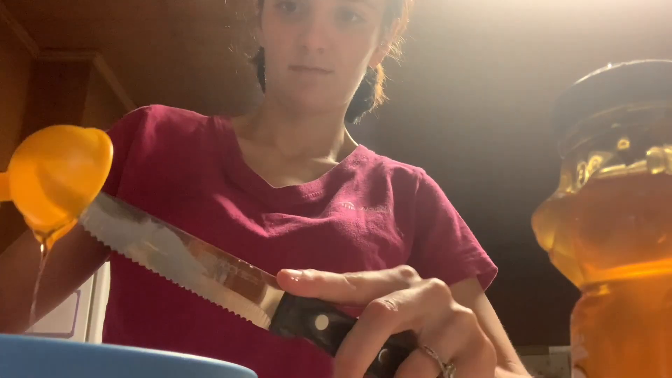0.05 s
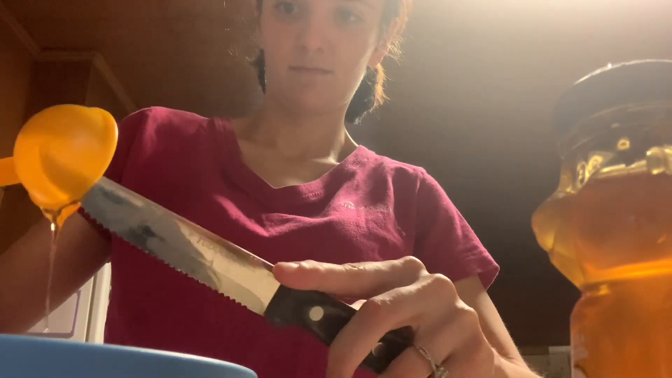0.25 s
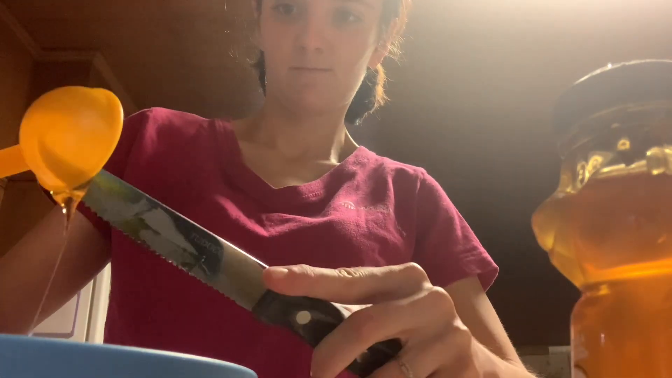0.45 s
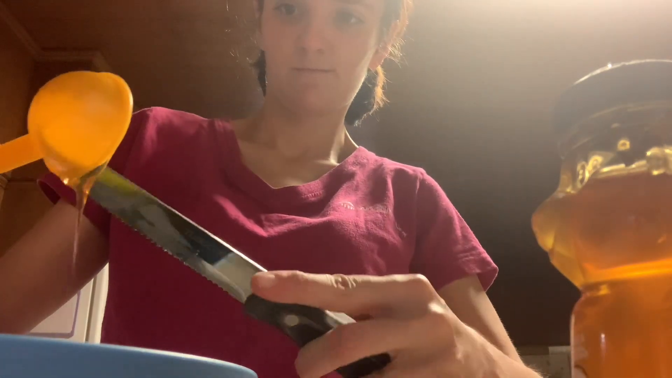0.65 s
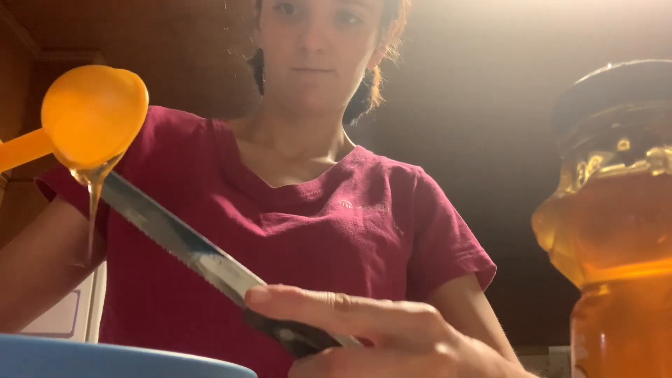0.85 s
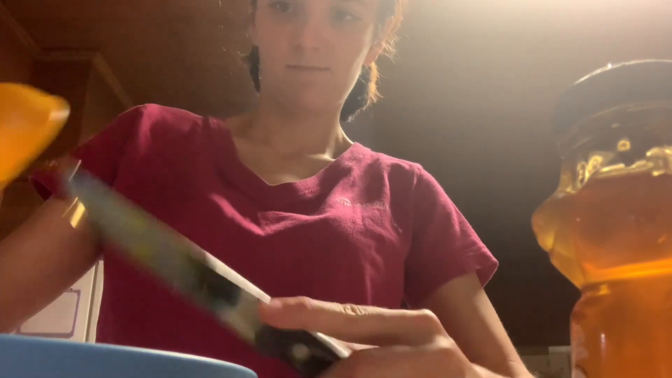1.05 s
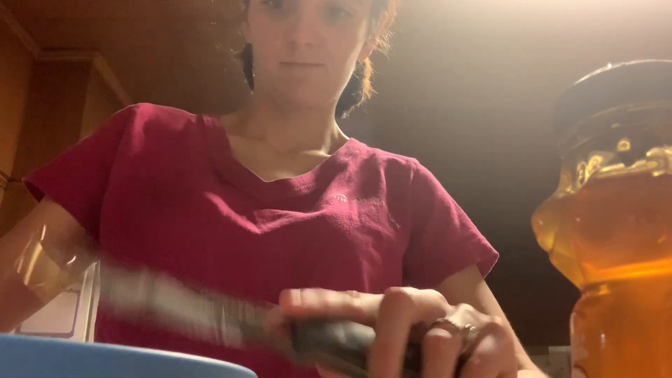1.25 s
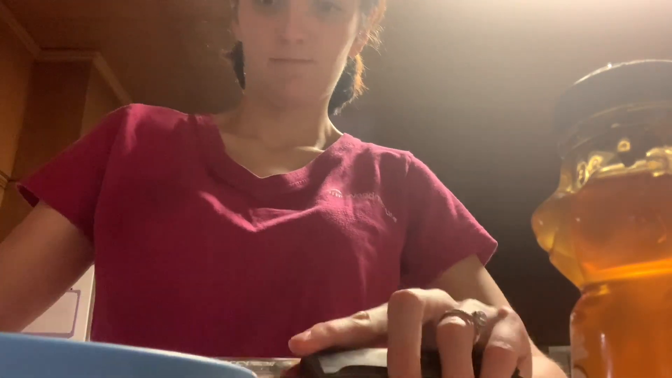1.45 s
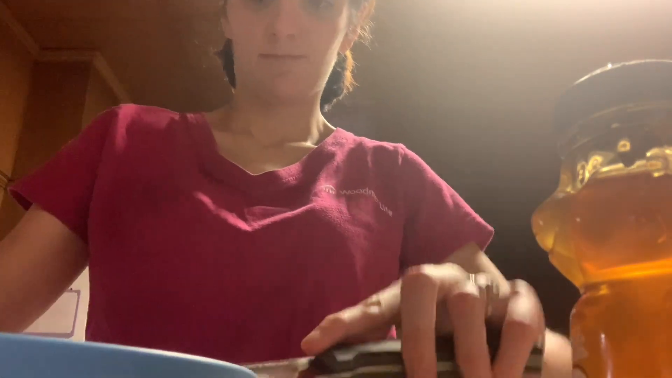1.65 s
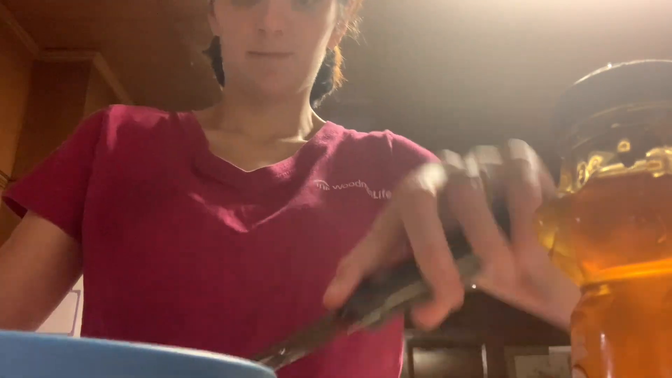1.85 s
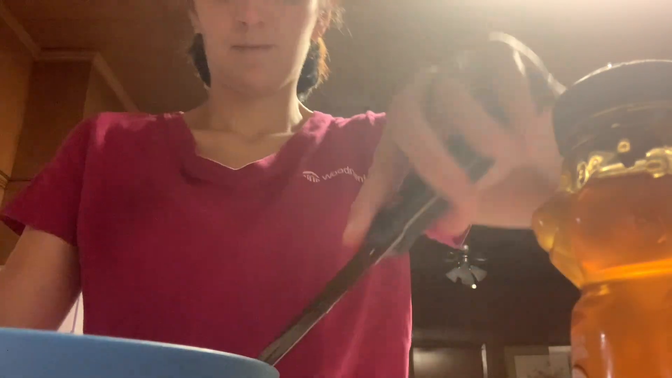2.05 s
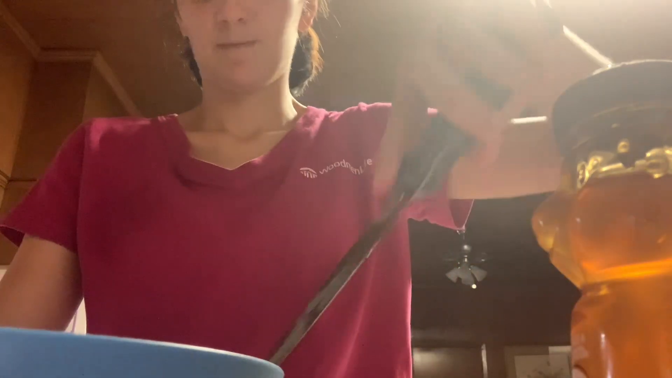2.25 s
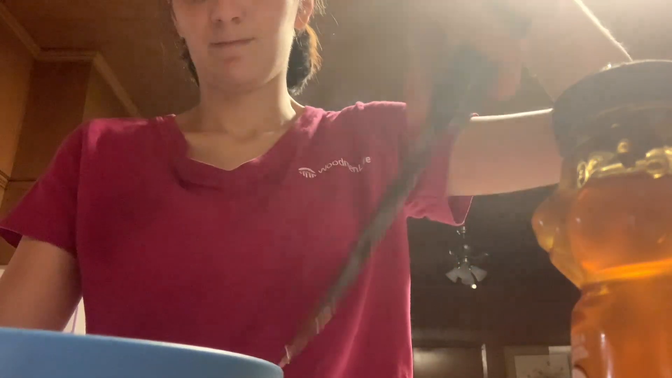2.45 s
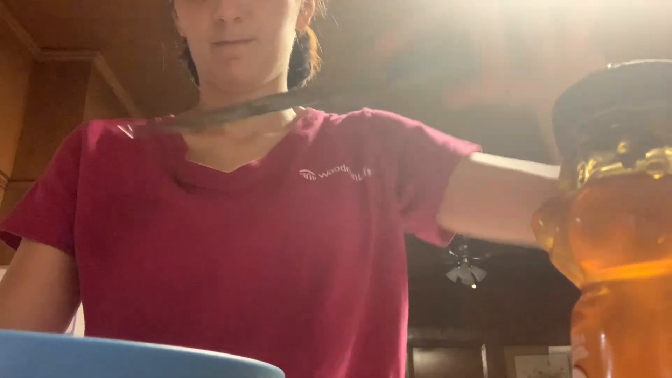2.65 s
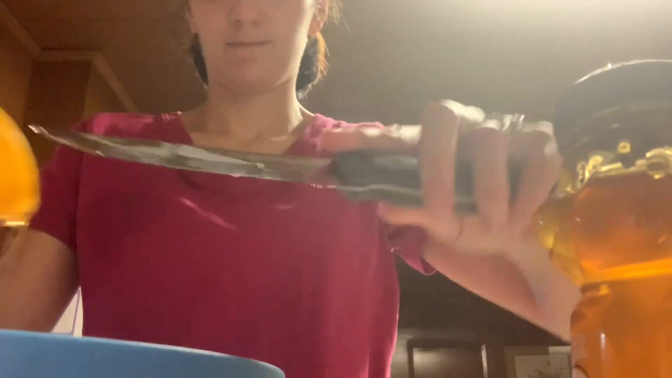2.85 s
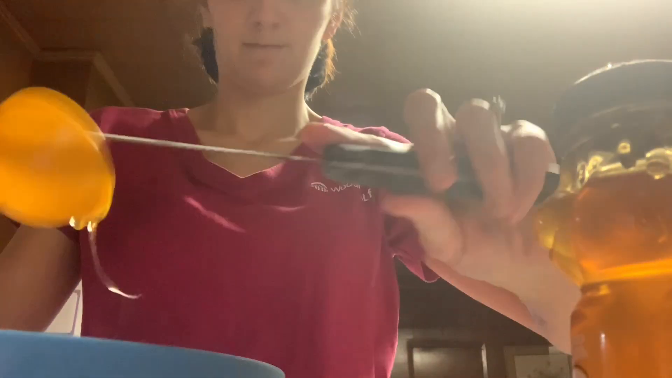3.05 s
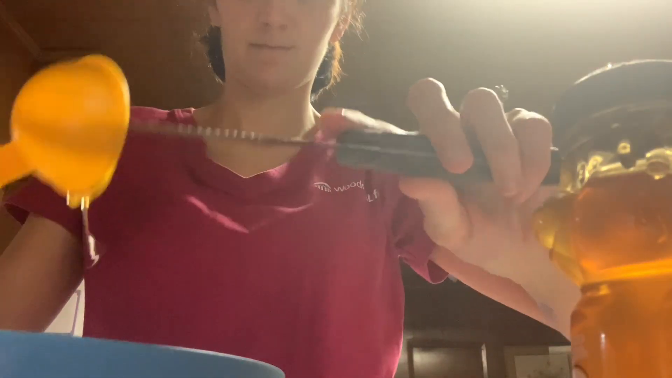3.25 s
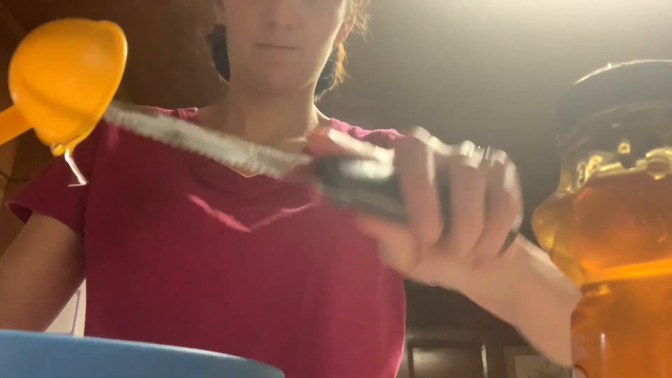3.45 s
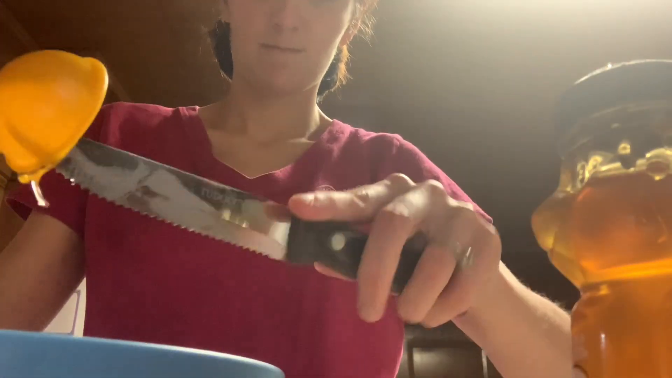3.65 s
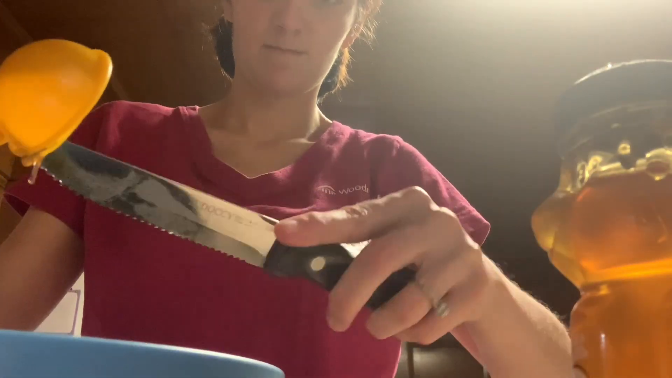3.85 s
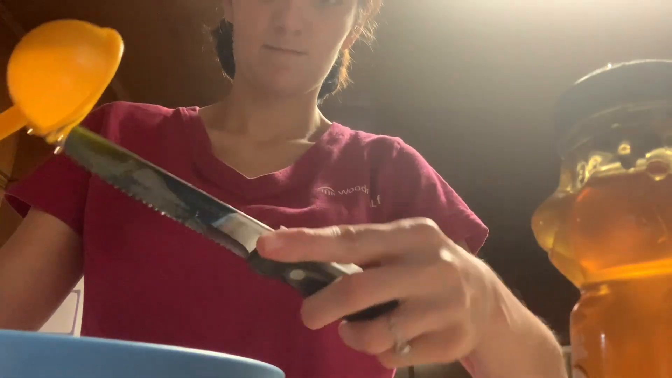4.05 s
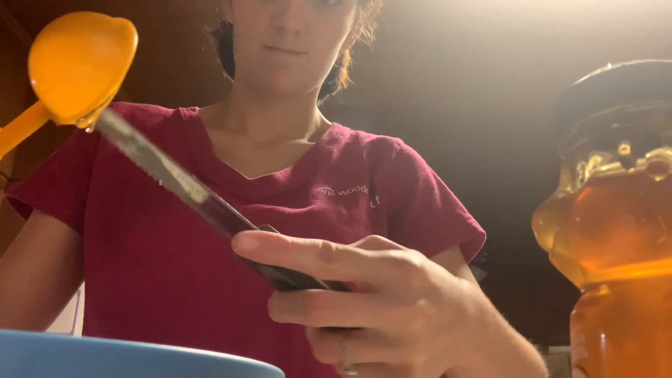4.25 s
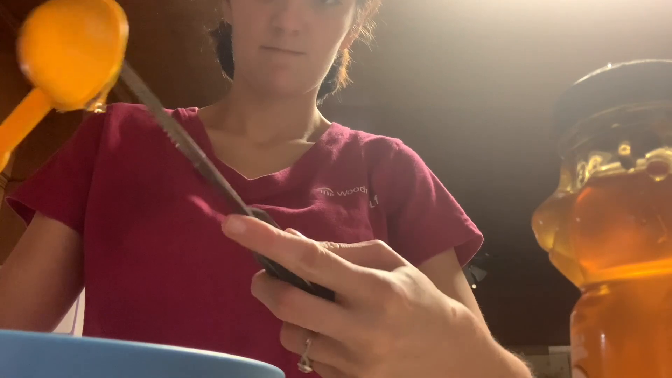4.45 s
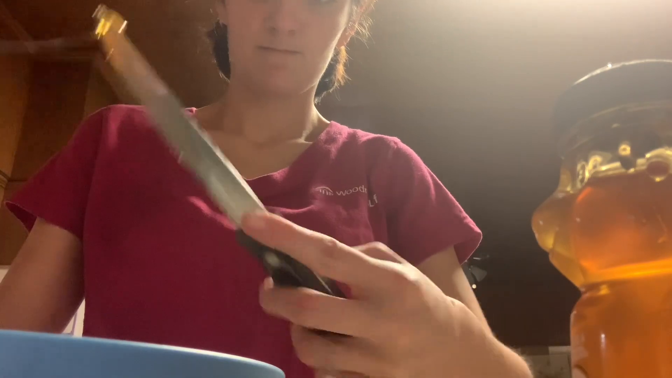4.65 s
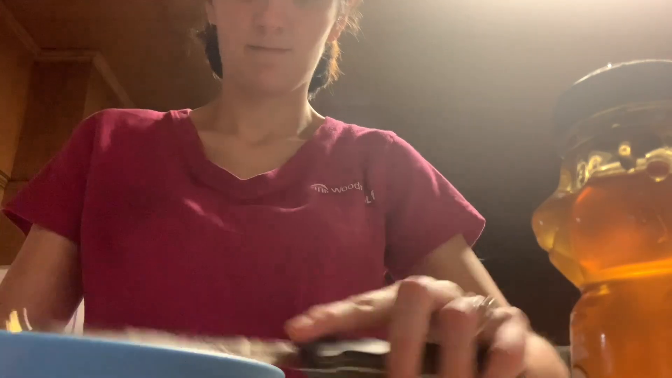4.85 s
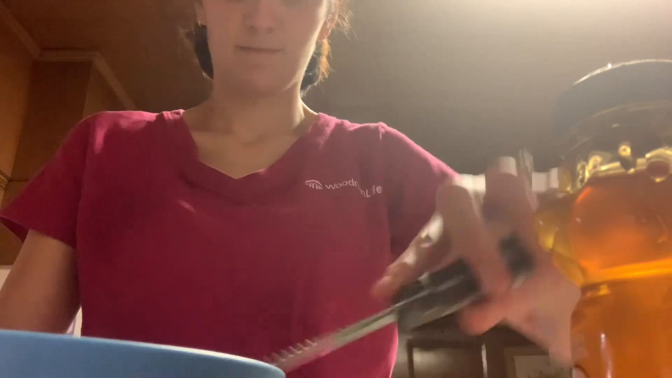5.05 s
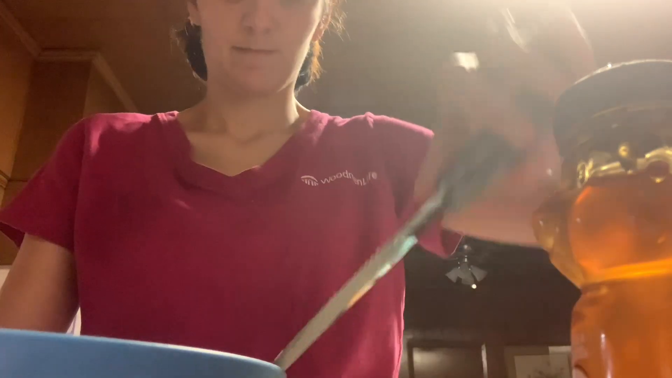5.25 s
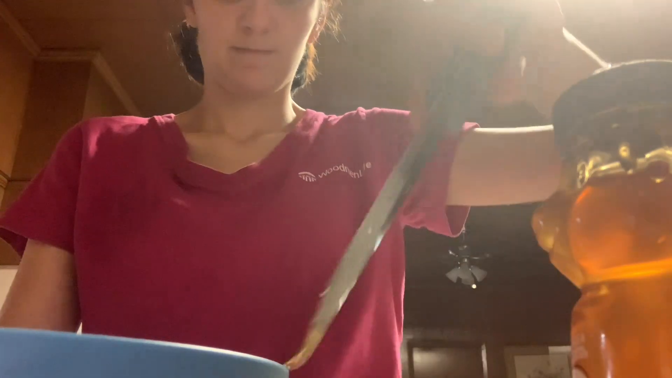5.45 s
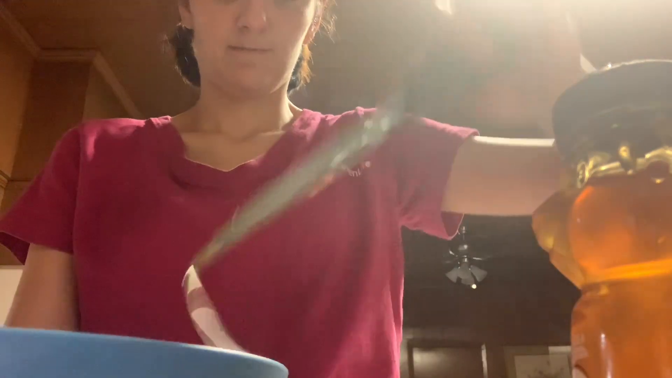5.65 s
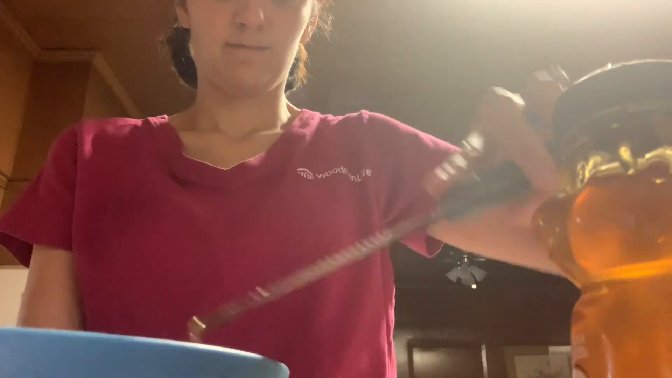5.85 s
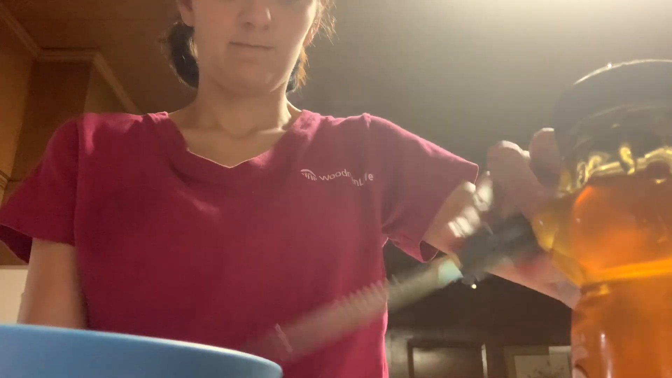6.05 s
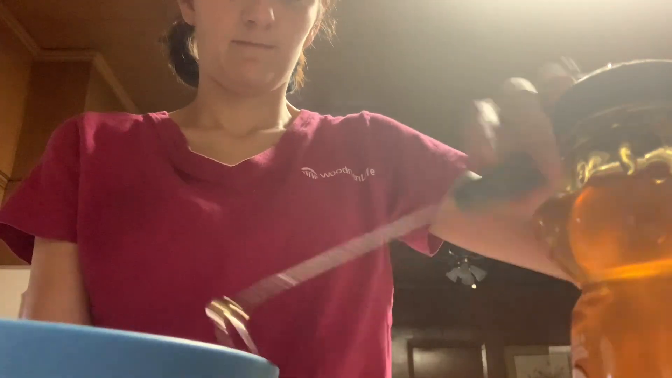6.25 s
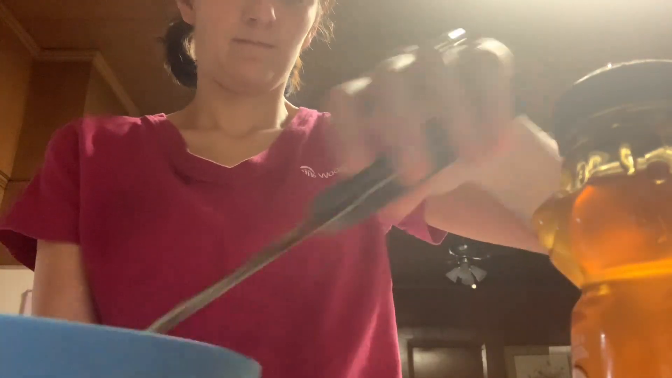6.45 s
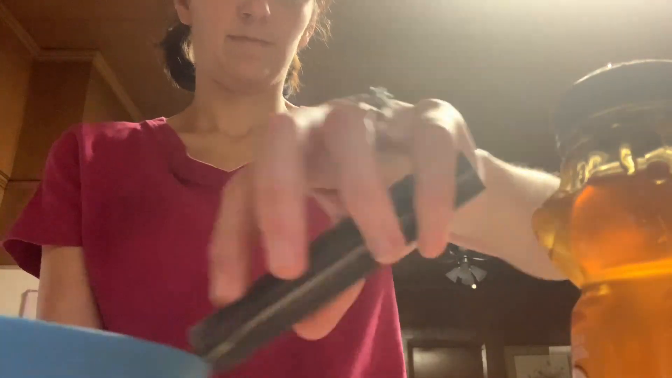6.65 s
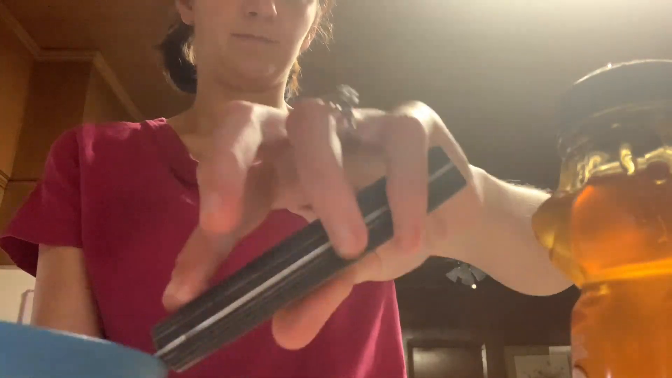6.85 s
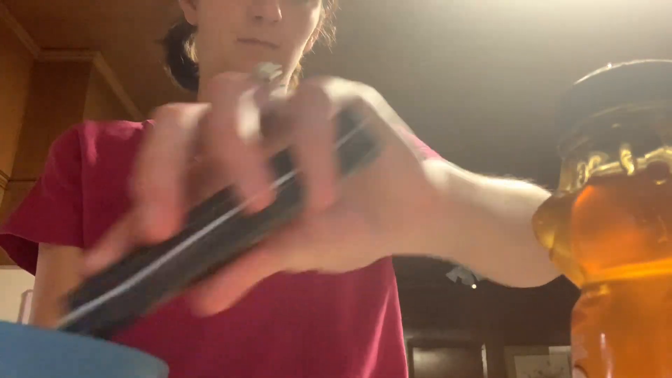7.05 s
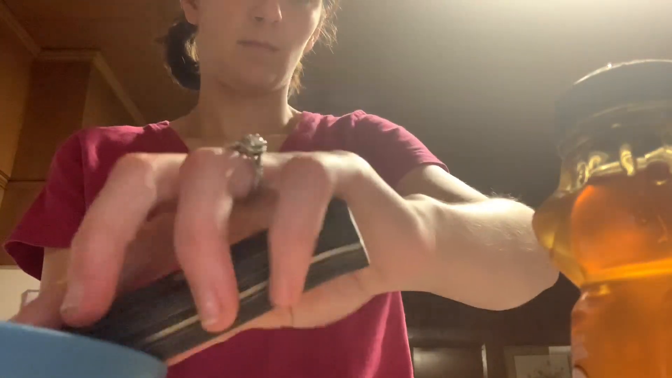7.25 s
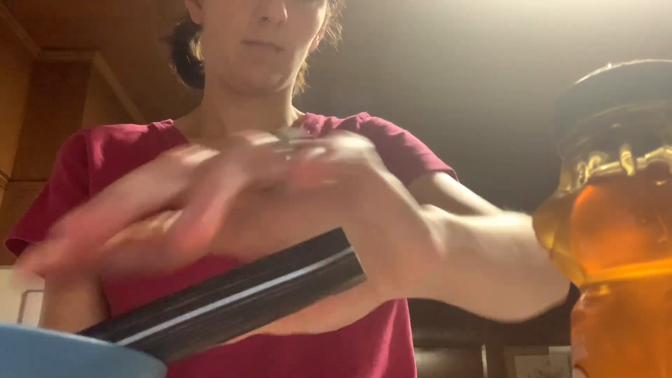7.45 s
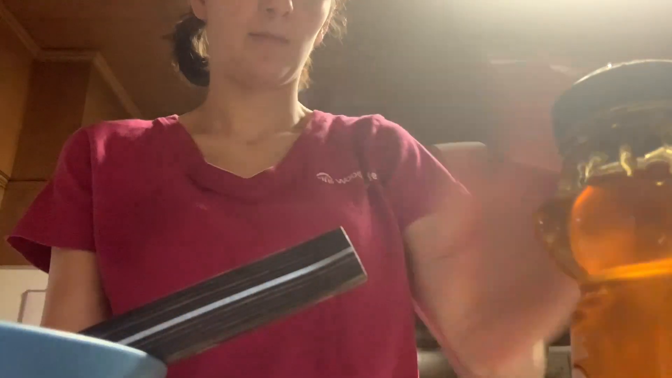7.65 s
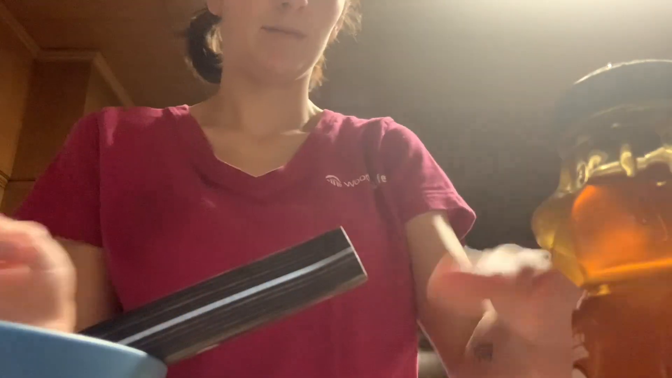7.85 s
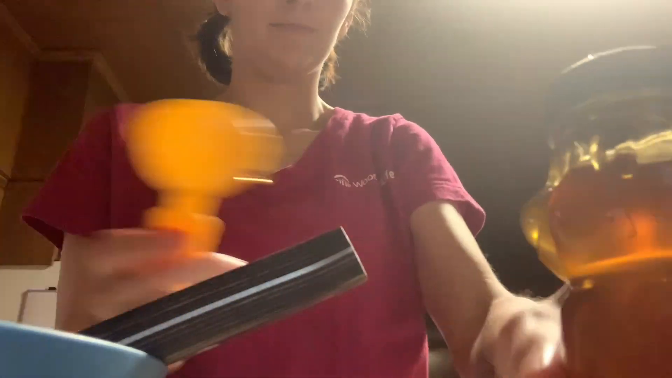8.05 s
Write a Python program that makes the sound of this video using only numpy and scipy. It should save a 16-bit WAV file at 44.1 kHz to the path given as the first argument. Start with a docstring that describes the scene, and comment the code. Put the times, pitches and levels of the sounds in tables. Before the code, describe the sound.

Spoon and serrated knife knock and rasp against a plastic bowl while sticky honey is scraped off, close up in a softly humming kitchen.

```python
"""On a kitchen counter, over a plastic bowl, honey is scraped from a plastic measuring spoon with a serrated knife.
Spoon and knife knock on the rim (damped modes struck by short pulses), and the teeth skip over it in a row.
The blade clicks on spoon and rim (pulses through resonances), rasps and squeaks (irregular, regular slips).
At last the knife is laid in the bowl and skids down its wall; the microphone stands on the counter beside it.
An appliance hums (narrow noise bands) in room noise whose treble sinks late on; a diffuse tail is the room."""
import sys
import numpy as np
from scipy import signal
from scipy.fft import rfft, irfft
from scipy.io import wavfile
from scipy.ndimage import uniform_filter1d

SR = 44100
rng = np.random.default_rng(int(sys.argv[2]) if len(sys.argv) > 2 else 0)


def store_pcm(level_fs):
    """Save levels as 16-bit WAV."""
    pcm = np.round(np.clip(level_fs, -1, 1) * 32767).astype(np.int16)
    wavfile.write(sys.argv[1], SR, np.atleast_2d(pcm).T)


N = 357651
TIME = np.arange(N) / SR
RING_TIME = np.arange(16384) / SR  # time axis of one contact

# room noise, its colour: [f/Hz, level/dB]
AIR_COLOUR = [(30, -28), (63, -1), (86, -13.5), (121, -15.5), (404, -11.5), (600, -21.5), (3770, -44),
              (9220, -36.5), (12300, -41.5), (16000, -49)]
AIR_DB = -50.8
# noise bands of the appliance: [f/Hz, distance to half amplitude/Hz, level/dB before the common hum gain]
HUM_BANDS = [(55.3, 8.9, -56), (118.7, 6.7, -58.5), (1782, 113, -74), (3560, 770, -69.5)]
# course of the treble, before weighting by frequency: [t/s, level/dB]
TREBLE_COURSE = [(6.75, 4), (6.85, -5), (7.25, -3.5), (7.75, -14), (8.0, -8.5)]
# likeness of the two microphone ports: [f/Hz, left-right coherence, clipped to +-0.99 in use]
PORT_COHERENCE = [(60, 0.87), (300, 0.54), (550, 0.13), (1000, 0.35), (3000, -0.21), (6500, 0.61),
                  (8600, -1.1), (9800, -1), (11500, 0.69)]
# balance of the ports: [f/Hz, left minus right level/dB]
PORT_BALANCE = [(60, 3.5), (120, 6.5), (300, 3.5), (900, -0.5), (5000, -.7)]
# decay of the room: [f/Hz, t60/s]
ROOM_DECAY = [(300, .55), (1500, .38), (14000, .4)]
# blows on the bowl: [t/s, push that rocks the bowl level/dB before the thump and body gains, body f/Hz,
# clack of the wall level/dB, clack f/Hz, crack of the blade level/dB]
KNOCKS = [(1.1062, -18.5, 270, -24, 560, -33), (1.1098, -13.5, 275, -26, 1500, -34),
          (1.141, -20.5, 255, -35, 1620, -43), (1.175, -31, 245, -41, 1000, -51),
          (1.283, -13, 270, -16.5, 955, -20), (1.314, -19.5, 243, -29, 980, -28),
          (1.351, -29, 240, -39, 1000, -48), (1.374, -29, 240, -44, 1650, -48),
          (1.4238, -18, 228, -23.5, 1950, -22.5), (1.446, -19, 246, -27.5, 1800, -35),
          (1.5041, -33.5, 290, -39.5, 1010, -44), (1.6762, -27, 289, -40.5, 1000, -45.5),
          (1.7616, -29.5, 280, -42, 1660, -49), (1.818, -28, 270, -43, 1950, -48),
          (1.8416, -27, 330, -24, 1610, -35), (1.8504, -23, 300, -26.5, 1250, -34),
          (1.8691, -30, 300, -34, 1980, -36), (2.137, -35, 260, -44, 1600, -46),
          (5.0487, -27, 260, -27, 1950, -25), (5.064, -25.5, 250, -33.5, 1750, -36),
          (6.0601, -20, 280, -20.5, 1900, -18), (6.0695, -14, 278, -22, 1230, -26),
          (6.5762, -21, 500, -21.5, 1300, -26.5), (6.5893, -22, 380, -21.5, 990, -29.5),
          (6.6215, -14.5, 320, -11.5, 1010, -22.5), (6.8556, -34.5, 390, -42.5, 1000, -43),
          (7.0991, -20, 350, -29.5, 640, -38), (7.112, -20, 342, -33.5, 950, -44),
          (7.1347, -29, 340, -35.5, 950, -45), (7.219, -28.5, 377, -24, 1500, -33),
          (7.391, -20.5, 320, -31.5, 950, -35), (7.9429, -37.5, 222, -53.5, 900, -68)]
# modes of the bowl on the counter, before random variation: [f/Hz, level/dB, t60/s]
BOWL_MODES = [(65.7, -15, .17), (125, 2, .11), (172, -1, .08), (225, -3, .06), (257, -2, .09),
              (290, -3, .055), (340, 0.5, .04), (410, -5.5, .05), (624.6, -15, .09), (711.5, -19, .13),
              (980, -16.5, .11), (1219, -17, .05), (1635, -12, .05), (1780, -12, .035), (3050, -14.5, .06),
              (3450, -16, .05)]
# modes of the steel blade: [f/Hz, level/dB, t60/s]
BLADE_MODES = [(1932, 0.5, .035), (2830, -7, 0.035), (3088, -4, 0.034), (3560, -8, 0.033)]
# colour of the first snap of a contact: [f/Hz, level/dB]
SNAP_COLOUR = [(60, -2), (900, -1), (3300, -1), (4500, -11.5), (9000, -11.5), (13000, -13.5)]
# drags of a utensil along the bowl: [start t/s, length/s, level/dB before the rasp and wall gains]
RUBS = [(1.122, .4, -48), (1.687, 0.18, -48), (1.92, .29, -55), (5.06, .26, -53), (5.9, 0.45, -45.5),
        (6.39, .23, -42.5), (6.599, .19, -36.5)]
# colour of the rasp on the bowl: [f/Hz, level/dB]
RASP_COLOUR = [(60, -9.5), (250, 7), (550, -2), (3000, -10), (13000, -28)]
# light contacts on spoon or rim, and the sharp edge of hard blows on the bowl, levels before their common gains:
# [t/s, crack level/dB, clack level/dB, edge tick level/dB]
CLICKS = [(1.4238, -29, -40, -35), (1.869, -47, -52, -50), (2.371, -42.5, -49.5, -64),
          (2.966, -24, -37.5, -42), (3.0554, -16, -25, -42), (3.3836, -29, -37.5, -39),
          (3.4164, -36, -49, -44), (3.4351, -36.5, -40, -46.5), (3.5018, -40, -56, -48),
          (3.523, -36, -41.5, -42.5), (3.5869, -44, -53, -43.5), (3.609, -45, -48, -53),
          (3.677, -45, -47, -52), (3.8001, -41.5, -51, -46.5), (4.101, -38.5, -48, -41.5),
          (5.0487, -35, -46, -41), (5.669, -54, -48.5, -68), (6.0601, -25, -35, -32),
          (6.871, -46, -54, -75), (7.0991, -40, -46, -51), (7.254, -49, -44, -75)]
# resonances of the spoon with the blade against it: [f/Hz, level/dB]
SPOON_RESONANCES = [(720, -8), (1700, 4), (2520, 0), (3450, 1), (3850, 3), (6100, -1), (12500, 3)]
# strokes of the blade through honey on the spoon, levels before their common gains:
# [start t/s, length/s, fine fizz level/dB, coarse crackle level/dB, mean slips per s]
SCRAPES = [(3.497, .04, -51, -56, 400), (3.585, .085, -54, -60, 320), (3.76, .2, -51, -51, 1500),
           (4.31, .17, -56, -72, 1200)]
# the teeth catch on the spoon and squeak once; the pitch is the one reached at full speed
SQUEAK_S, SQUEAK_LENGTH_S, SQUEAK_HZ, SQUEAK_DB = 4.106, 0.045, 680, -39.5
# the knife slips deeper into the bowl: [start t/s, length/s, level/dB, f/Hz]
SKIDS = [(6.947, .05, -48, 1750), (7.1, .07, -44, 3850)]
EDGE_HZ = 16300  # upper limit of the sound


def amp(db):
    """Level definition: decibels to amplitude ratio."""
    return 10 ** (np.asarray(db) / 20)


def evened(x):
    """Power normalisation: scales to rms 1."""
    return x / np.sqrt(np.mean(x ** 2) + 1e-20)


def at_peak(x, db):
    """Short-time level: sets the loudest 5 ms of a sound to the given rms level."""
    power = uniform_filter1d((x ** 2).mean(0), size=220)
    return amp(db) * x / np.sqrt(power.max())


def read(points, hz):
    """Interpolation of a table along a logarithmic frequency axis."""
    f, value = np.transpose(points)
    return np.interp(np.log(hz + 1), np.log(f + 1), value)


def add(mix, s, sound):
    """Superposition: adds a stereo sound to the mix from time s."""
    part = mix[:, round(s * SR):][:, :sound.shape[1]]
    part += sound[:, :part.shape[1]]


def band(x, lo_hz, hi_hz):
    """Causal band-pass filtering."""
    sos = signal.butter(3, [lo_hz, hi_hz], "band", fs=SR, output="sos")
    return signal.sosfilt(sos, x)


def lifted(x, hz, q, lift_db):
    """Resonance: raises one frequency out of a sound."""
    return x + amp(lift_db) * signal.lfilter(*signal.iirpeak(hz, q, fs=SR), x)


def coloured(pair, spectrum):
    """Linear filtering and coherence: colours two unrelated signals and mixes them to the likeness of the ports."""
    size = pair.shape[1]
    hz = abs(np.fft.fftfreq(size, 1 / SR))
    log_colour = np.log(amp(read(spectrum, hz)))
    # the Hilbert transform ties phase to level
    colour = np.exp(signal.hilbert(log_colour))[:size // 2 + 1]
    same = np.clip(read(PORT_COHERENCE, hz[:size // 2 + 1]), -.99, .99)
    mid, side = rfft(pair) * colour * np.sqrt([1 + same, 1 - same])
    return irfft(np.array([mid + side, mid - side]), size)


def background(hum_gain_db=5.0):
    """Stationary noise: room noise plus narrow bands whose random beating makes the appliance hum waver."""
    air = amp(AIR_DB) * evened(coloured(rng.standard_normal((2, N)), AIR_COLOUR))
    f = np.fft.rfftfreq(N, 1 / SR)
    drive = rfft(coloured(rng.standard_normal((2, N)), [(25, -22), (55, -3.5)]))
    for hz, width, db in HUM_BANDS:
        resonance = 1 / (1 + ((f - hz) / width) ** 2)
        air += amp(db + hum_gain_db) * evened(irfft(drive * resonance, N))
    hz, t, z = signal.stft(air, SR, nperseg=512)
    share = np.minimum((hz / 2400) ** 4, 1.45)[:, None]  # the treble alone follows the course
    course_db = share * np.interp(t, *np.transpose(TREBLE_COURSE))
    return signal.istft(z * amp(course_db), SR, nperseg=512)[1][:, :N]


def snap(fast_s, slow_s, slow_db, direct_db):
    """Impulsive contact: one sharp pulse, then waves scattering in the plastic with a two-rate decay."""
    decay = np.exp(-RING_TIME / fast_s) + amp(slow_db) * np.exp(-RING_TIME / slow_s)
    fade = decay * (1 - np.exp(-(2 * RING_TIME / fast_s) ** 2))
    waves = rng.standard_normal((2, len(RING_TIME))) * fade / np.linalg.norm(fade)
    pulse = signal.hilbert(signal.unit_impulse(len(RING_TIME), 30))
    quadrature = np.array([pulse.real, pulse.imag])  # an unrelated pair from one pulse
    contact = coloured(waves + amp(direct_db) * quadrature, SNAP_COLOUR)
    return contact * (1 - RING_TIME / RING_TIME[-1])


def ring(place_db=2.0, detune=0.0085, port_turn=1.1):
    """Modal superposition: the bowl's damped modes, their balance changing a little with the place touched."""
    hz, db, t60 = np.transpose(BOWL_MODES)[:, :, None]
    place, grip, angle = rng.standard_normal((3, len(BOWL_MODES), 1))
    onset = 1 - np.exp(-2 * RING_TIME * hz)
    swing = amp(db + place_db * place - 60 * RING_TIME / t60) * onset
    phase = 2 * np.pi * hz * (1 + detune * grip) * RING_TIME
    apart = port_turn * angle * hz / (hz + 350)  # the ports hear short waves out of step
    return np.array([(swing * np.cos(phase + side * apart)).sum(0) for side in (1, -1)])


def blade():
    """Damped vibration: the knife's modes, damped by the hand, reach each port with their own phase."""
    hz, db, t60 = np.transpose(BLADE_MODES)[:, :, None]
    swing = amp(db - 60 * RING_TIME / t60) * (1 - np.exp(-RING_TIME * hz / 2))
    turns = hz * RING_TIME + rng.random((2, len(BLADE_MODES), 1))
    return (swing * np.sin(2 * np.pi * turns)).sum(1)


def bend(x, lag_s, corner_hz):
    """Dispersion: bending waves are slower in the bass, so each blow sweeps quickly downwards."""
    hz = np.fft.rfftfreq(x.shape[1], 1 / SR)
    turns = lag_s * corner_hz * np.log(1 + hz / corner_hz)
    return irfft(rfft(x) * np.exp(-2j * np.pi * turns))


def knocks(thump_db=-3.5, body_db=1.5, ring_db=-2.0, steel_db=-4.0, tick_db=-24, tick_s=.003, crack_hz=3020):
    """Impact excitation: a push drives body and counter, the wall clacks at its own pitch, the blade rings."""
    out = np.zeros((2, N))
    for s, push, body_hz, clack, clack_hz, crack in KNOCKS:
        contact = snap(fast_s=.0016, slow_s=0.01, slow_db=-10.5, direct_db=-6.0)
        blow = bend(at_peak(contact, 0) + at_peak(ring(), ring_db), lag_s=.007, corner_hz=110)
        thump = at_peak(band(blow, 58, 180), push + thump_db)
        body = at_peak(lifted(band(blow, 165, 520), body_hz, q=4.5, lift_db=3), push + body_db)
        wall = at_peak(lifted(band(blow, 560, 2000), clack_hz, q=9, lift_db=6.5), clack)
        edge = at_peak(lifted(band(blow, 2350, 5800), crack_hz, q=8, lift_db=-5), crack)
        tick = at_peak(band(blow * np.exp(-RING_TIME / tick_s), 8200, EDGE_HZ), crack + tick_db)
        steel = at_peak(blade(), crack + steel_db)
        add(out, s, thump + body + wall + edge + tick + steel)
    return out


def kitchen(x, wet_db=-18.0, build_s=0.0035):
    """Reverberation: convolution with a diffuse noise tail, each band dying at its own speed."""
    hz, t, z = signal.stft(rng.standard_normal((2, SR)), SR, nperseg=256)
    decay = amp(-60 * t / read(ROOM_DECAY, hz)[:, None])
    tail = signal.istft(z * decay, SR, nperseg=256)[1][:, :SR]
    build = 1 - np.exp(-np.arange(SR) / SR / build_s)
    tail = coloured(tail * build, [(400, 3), (2500, 0)])
    return amp(wet_db) * signal.fftconvolve(x, tail / np.linalg.norm(tail[0]), axes=1)[:, :N]


def slips(per_s, spread_db, smooth):
    """Stick-slip friction: tiny random releases of uneven size over a smooth rub."""
    released = rng.random(N) < per_s / SR
    size = amp(spread_db * np.minimum(rng.exponential(1, N), np.pi)) * released
    return evened(size * rng.standard_normal((2, N))) + smooth * rng.standard_normal((2, N))


def stroke(start, length, press, lift):
    """Contact pressure: it builds, holds and lets go; press and lift are shares of the length."""
    along = (TIME - start) / length
    return np.clip(np.minimum(along / press, (1 - along) / lift), 0, 1)


def wander(over_s):
    """Low-pass noise: a smooth random curve of rms 1 that changes course in about the given time."""
    sos = signal.butter(2, 1 / (np.pi * over_s), fs=SR, output="sos")
    return evened(signal.sosfilt(sos, rng.standard_normal(N)))


def resonate(x, hz, width_hz):
    """Heterodyning: a resonance follows the curve hz by shifting the sound to zero frequency and back."""
    turn = np.exp(2j * np.pi * np.cumsum(hz) / SR)
    r = np.exp(-np.pi * width_hz / SR)
    return (turn * signal.lfilter([1 - r], [1, -r], x / turn)).real


def rubs(rasp_db=-1.5, wall_db=-4.5, waver_db=2.0, waver_s=0.02, drift=.025, drift_s=.06, width_hz=70):
    """Friction-driven modes: slips rasp and ring the wall, whose upper modes drift as the contact travels."""
    grain = slips(per_s=1300, spread_db=3, smooth=.4)
    wall = np.zeros((2, N))
    for hz, db, _ in BOWL_MODES[-6:]:
        strength = amp(db + waver_db * wander(waver_s))
        wall += strength * resonate(grain, hz * (1 + drift * wander(drift_s)), width_hz)
    rasp = amp(rasp_db) * evened(coloured(grain, RASP_COLOUR))
    pressure = sum(amp(db) * stroke(start, length, press=0.2, lift=0.3) for start, length, db in RUBS)
    return (rasp + amp(wall_db) * evened(wall)) * pressure


def spoon(x, q=8):
    """Resonance: adds the spoon's strongly damped resonances to a sound."""
    return x + sum(amp(db) * signal.lfilter(*signal.iirpeak(hz, q, fs=SR), x) for hz, db in SPOON_RESONANCES)


def clicks(clack_db=1.5, crack_db=-2.0, tick_db=5.5):
    """Short pulses have bright spectra: light contacts on spoon or rim, and the sharp edge of hard blows on the bowl."""
    out = np.zeros((2, N))
    for s, crack, clack, tick in CLICKS:
        contact = snap(fast_s=0.0005, slow_s=0.004, slow_db=-8, direct_db=-4)
        touch = bend(spoon(contact), lag_s=.005, corner_hz=500)  # the low part comes a little late
        low = at_peak(band(touch, 750, 2000), clack + clack_db)
        middle = at_peak(band(touch, 2100, 6800), crack + crack_db)
        high = at_peak(band(touch, 8200, 15200), tick + tick_db)
        add(out, s, low + middle + high)
    return out


def teeth(first_db=-38.0, fall_db=2.0, body_db=0.0, snap_db=-4.5):
    """Periodic impacts: tooth after tooth of the edge drawn over the rim rings blade and bowl, ever more lightly."""
    out = np.zeros((2, N))
    for k, s in enumerate(np.arange(1.899, 2.2, .031)):  # one tooth every 31 ms
        catch = band(snap(fast_s=0.0017, slow_s=.006, slow_db=-10, direct_db=-1), 700, 5800)
        tooth = at_peak(blade(), 0) + at_peak(ring(), body_db) + at_peak(catch, snap_db)
        add(out, s, amp(first_db - k * fall_db) * tooth)
    return out


def scrapes(fizz_db=0.5, crackle_db=0.5):
    """Stick-slip in honey: few slips are single ticks of a creeping blade, many a rough fizz and crackle."""
    out = np.zeros((2, N))
    for start, length, fine, coarse, per_s in SCRAPES:
        grains = spoon(coloured(slips(per_s, spread_db=2.5, smooth=.25)[:, :SR], SNAP_COLOUR))
        fizz = amp(fine + fizz_db) * evened(band(grains, 3800, 14500))
        crackle = amp(coarse + crackle_db) * evened(band(grains, 450, 1300))
        pressure = stroke(start, length, press=0.2, lift=0.31)[round(start * SR):][:SR]
        add(out, start, (fizz + crackle) * pressure)
    return out


def squeak(jitter=0.0048, slow_start=.17, settle_s=.009):
    """Regular stick-slip: a pulse train makes a brief buzzing note that rises as the blade gathers speed."""
    speed = 1 - slow_start * np.exp(-np.maximum(TIME - SQUEAK_S, 0) / settle_s)
    uneven = evened(uniform_filter1d(rng.standard_normal(N), size=60))
    rate = SQUEAK_HZ * speed * (1 + jitter * uneven)
    train = np.diff(np.floor(np.cumsum(rate) / SR), prepend=0) - rate / SR  # one pulse a cycle, mean removed
    pulses = signal.hilbert(train)
    note = spoon(coloured(np.array([pulses.real, pulses.imag]), SNAP_COLOUR))
    return amp(SQUEAK_DB) * evened(note) * stroke(SQUEAK_S, SQUEAK_LENGTH_S, press=0.16, lift=.2)


def skid():
    """Sliding friction: the knife goes down the wall in short, gritty skids, each with its own resonance."""
    grit = band(slips(per_s=1000, spread_db=2, smooth=.35), 1100, 3700)
    out = np.zeros((2, N))
    for start, length, db, hz in SKIDS:
        pitched = evened(lifted(grit, hz, q=6, lift_db=5))
        out += amp(db) * pitched * stroke(start, length, press=0.25, lift=.45)
    return out


def scene(spoon_room_db=-5):
    """Direct and diffuse field: the kitchen answers the bowl's sounds more than the clicks and spoon sounds."""
    on_bowl = knocks() + teeth() + rubs() + skid()
    clicks_and_spoon = clicks() + scrapes() + squeak()
    room = kitchen(on_bowl + amp(spoon_room_db) * clicks_and_spoon)
    return on_bowl + clicks_and_spoon + room + background()


def record(dry):
    """Transducer response: the left port takes more bass, the hardest peaks are capped, then the band is limited."""
    half_db = read(PORT_BALANCE, np.fft.rfftfreq(N, 1 / SR)) / 2
    ports = irfft(rfft(dry) * amp([half_db, -half_db]), N)
    ports = np.clip(ports, -.92, .92)
    low_pass = signal.firwin(511, EDGE_HZ, window=("kaiser", 9), fs=SR)
    return signal.oaconvolve(ports, low_pass[None], "same")


dry = scene()
out = record(dry)
store_pcm(out)
```